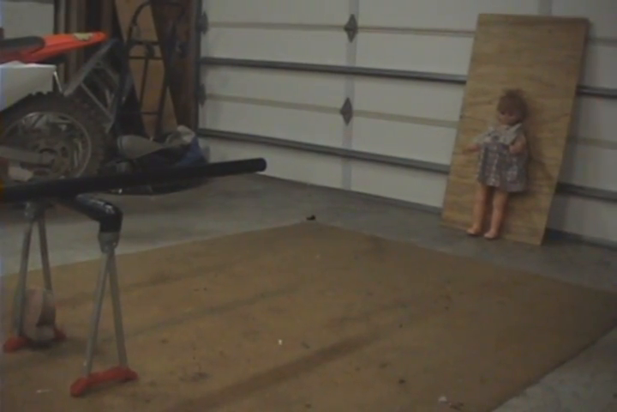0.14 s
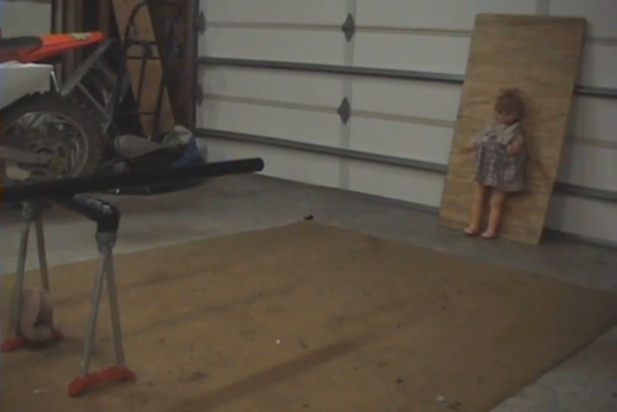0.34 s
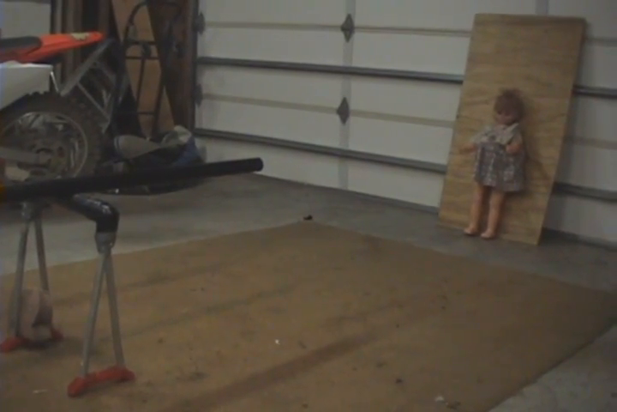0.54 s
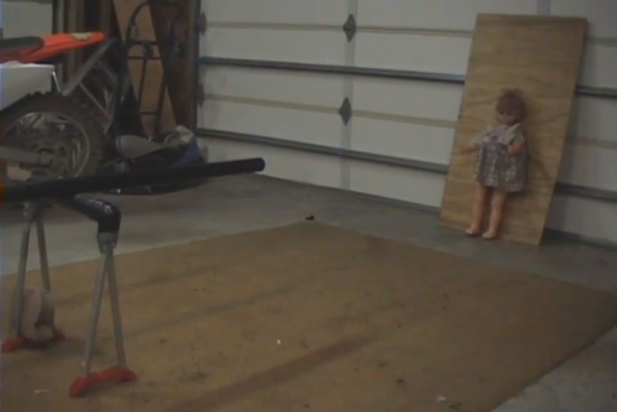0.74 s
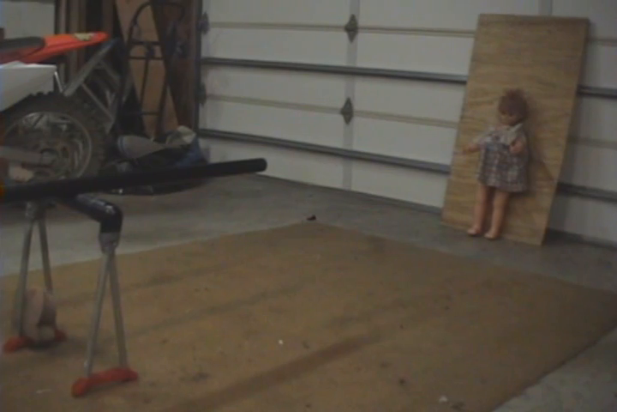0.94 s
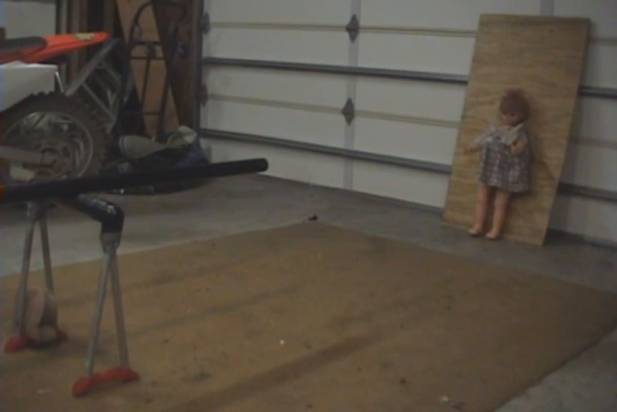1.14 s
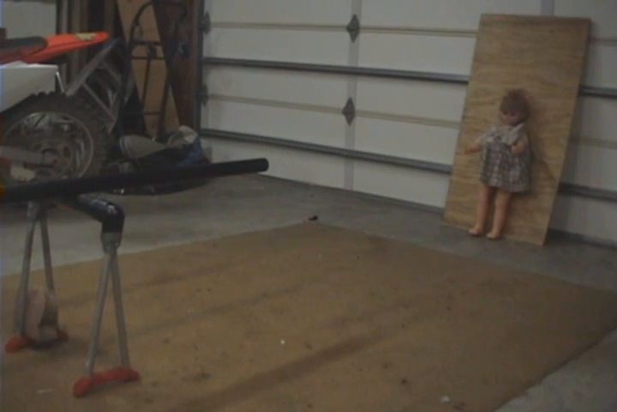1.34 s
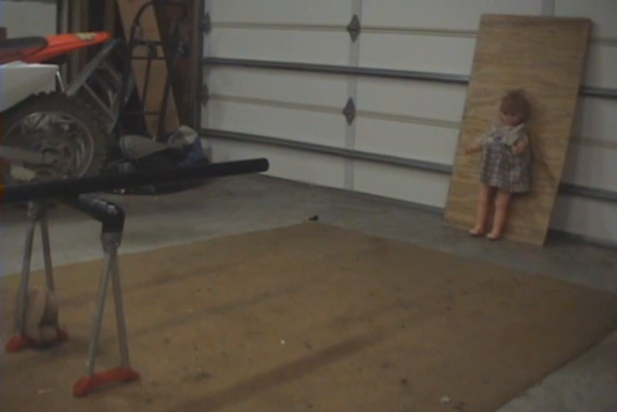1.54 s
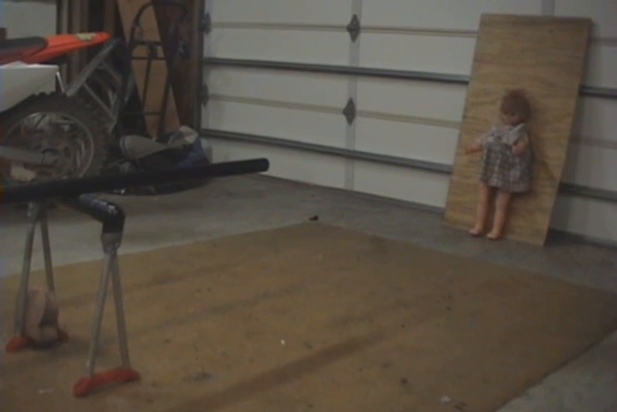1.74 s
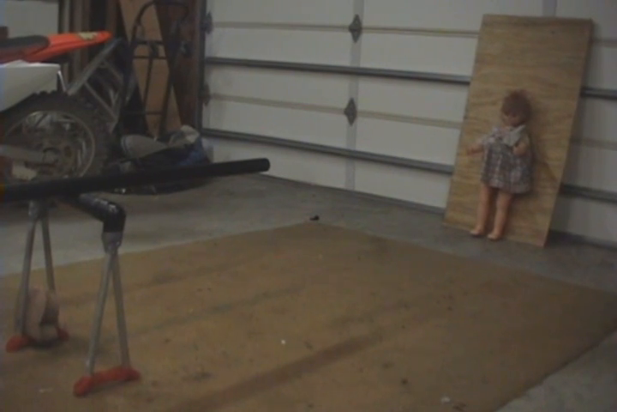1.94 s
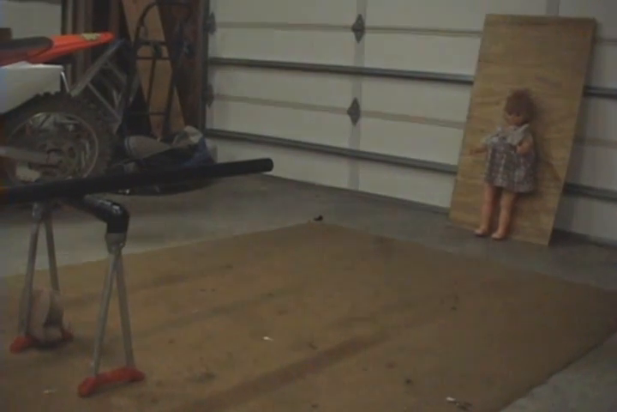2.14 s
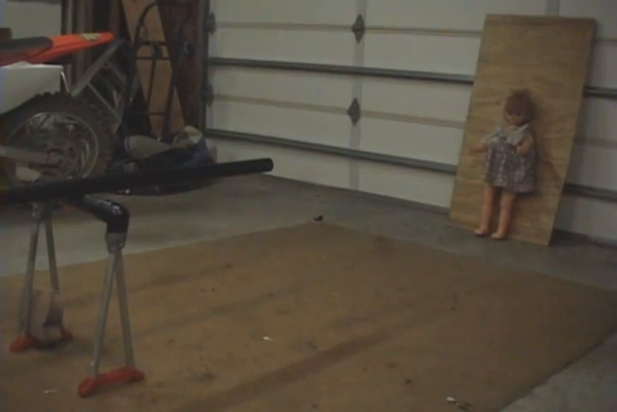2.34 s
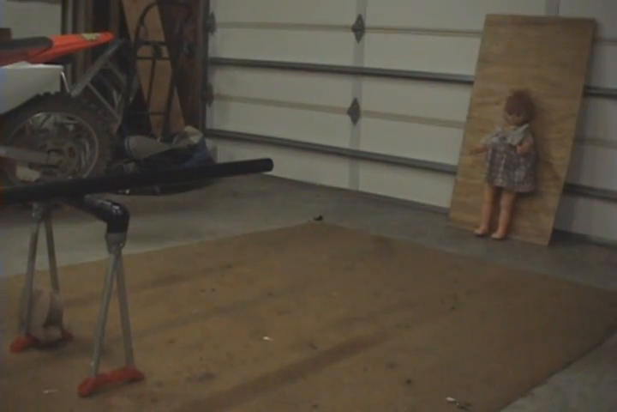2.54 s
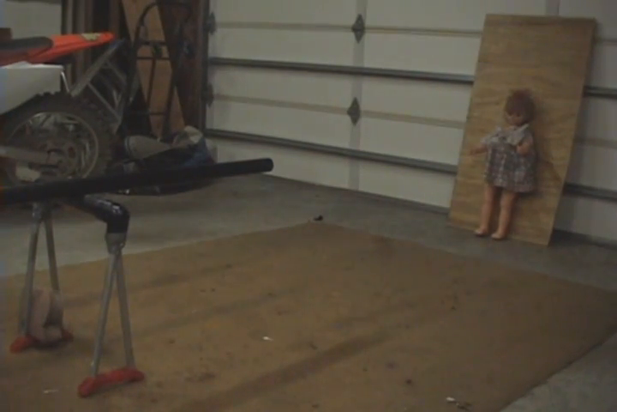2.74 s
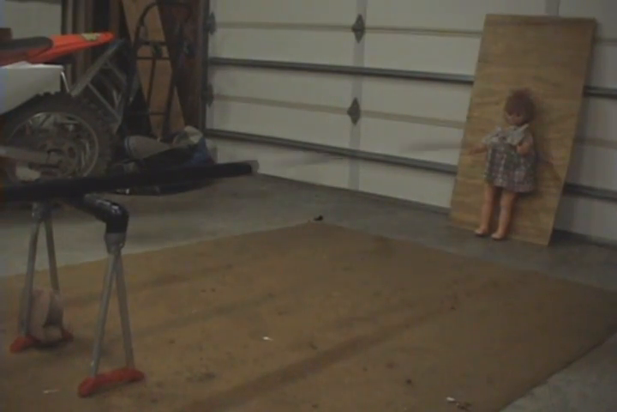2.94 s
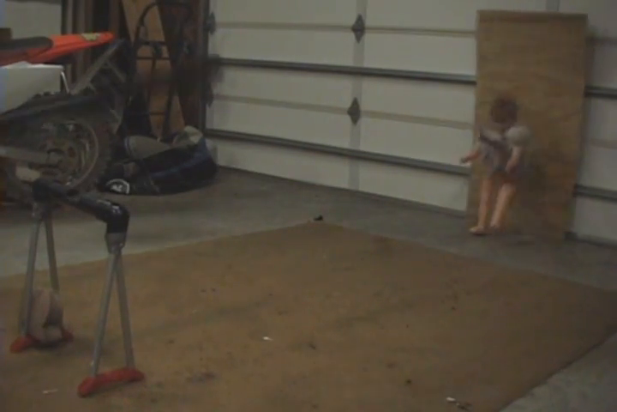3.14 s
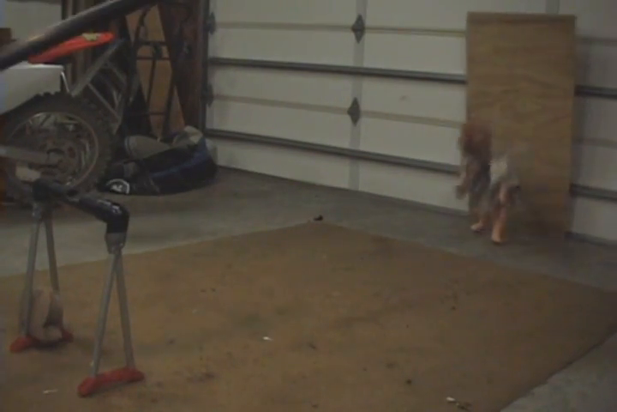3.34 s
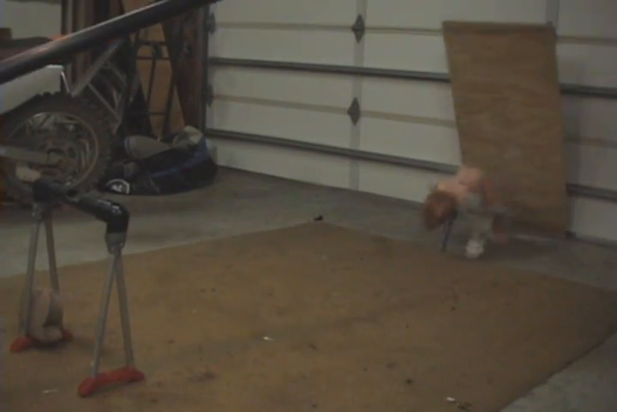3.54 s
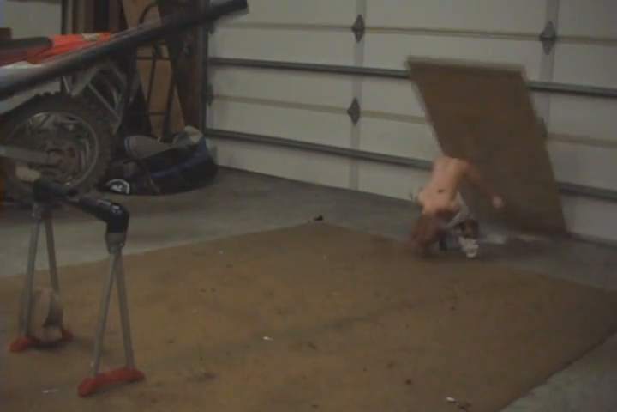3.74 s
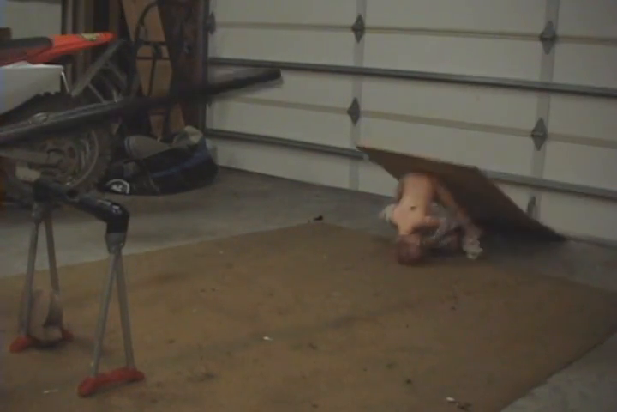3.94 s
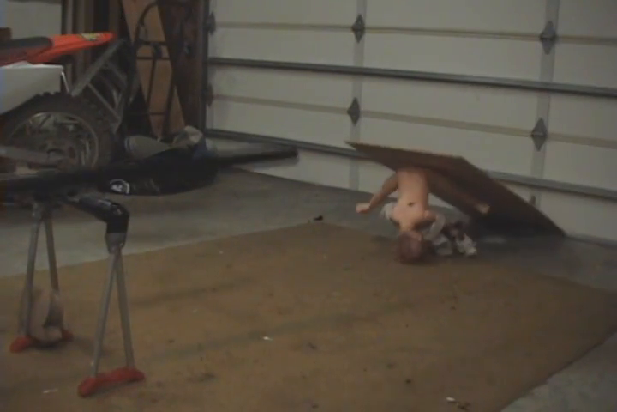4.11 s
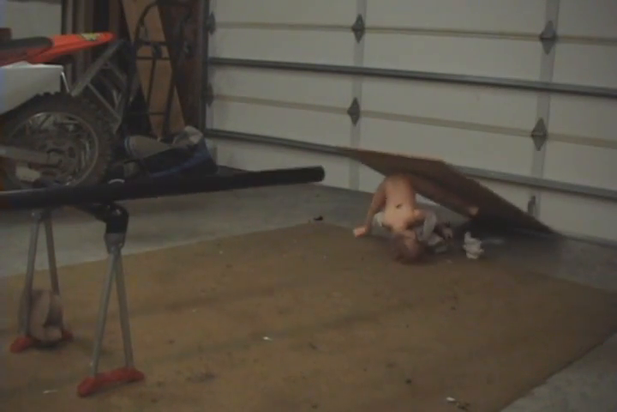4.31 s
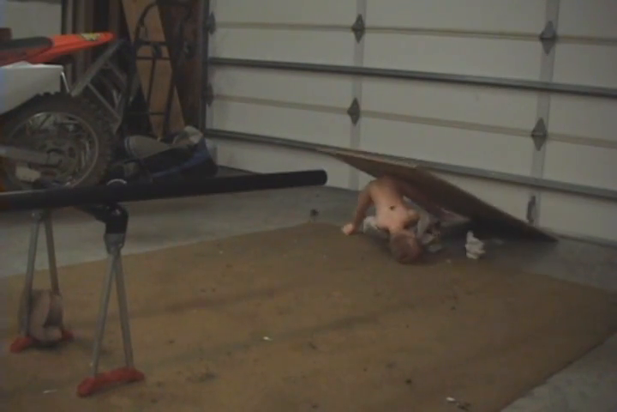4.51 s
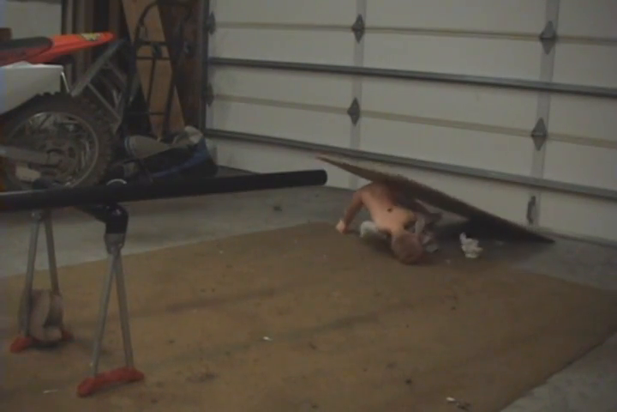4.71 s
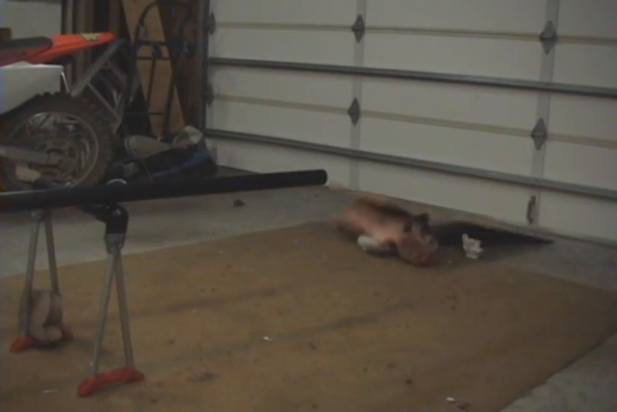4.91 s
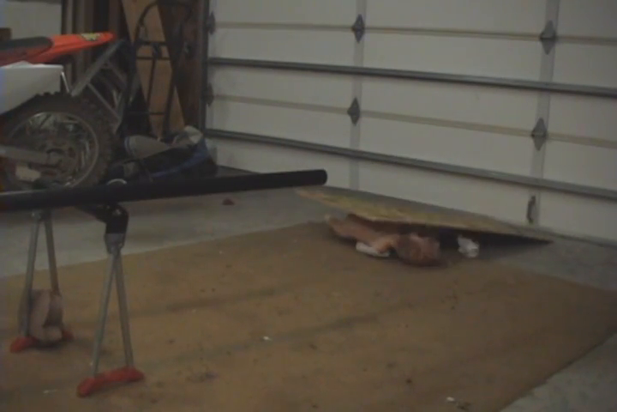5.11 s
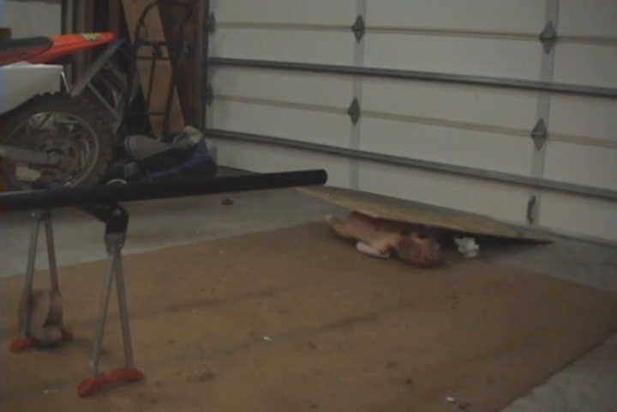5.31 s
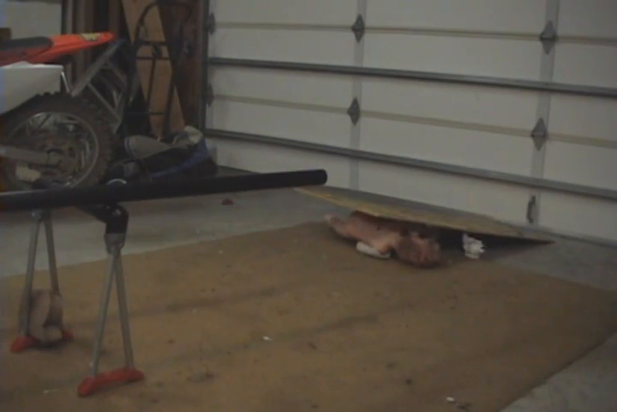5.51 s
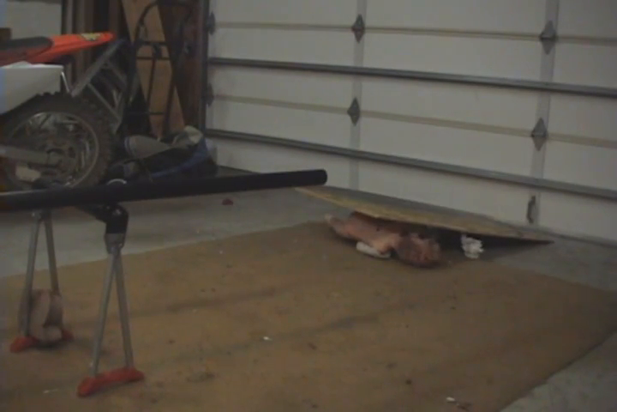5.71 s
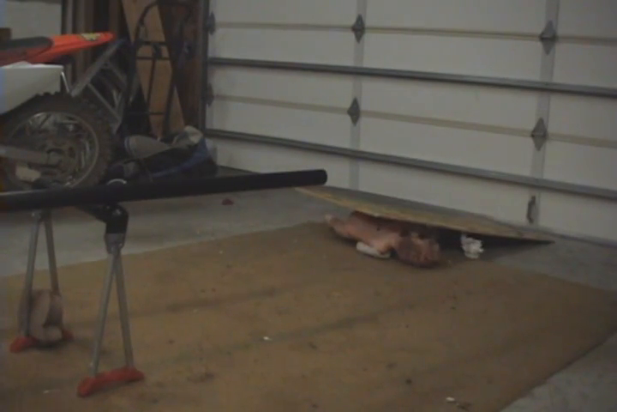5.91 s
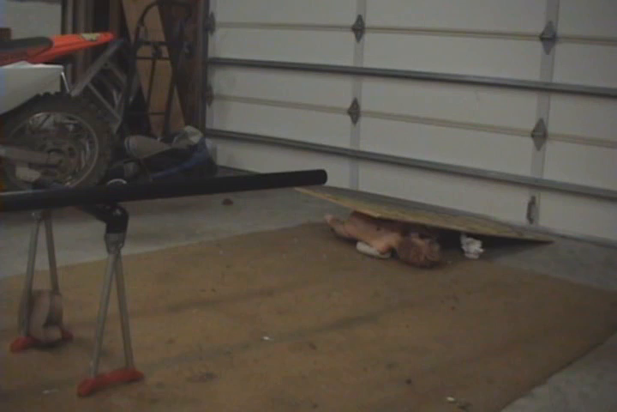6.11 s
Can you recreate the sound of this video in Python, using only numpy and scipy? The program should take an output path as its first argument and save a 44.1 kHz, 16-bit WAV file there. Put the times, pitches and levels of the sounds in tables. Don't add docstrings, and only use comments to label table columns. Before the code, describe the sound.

Plastic clicks over faint hiss and drone, then a potato gun snaps and roars in a garage, and a board and doll crash down.

```python
import sys
import numpy as np
from scipy import signal
from scipy.fft import rfft, irfft, next_fast_len
from scipy.io import wavfile
from scipy.ndimage import uniform_filter1d, map_coordinates

SR = 44100
rng = np.random.default_rng(int(sys.argv[2]) if len(sys.argv) > 2 else 0)


def gain_from_decibels(decibels):
    exponent = np.asarray(decibels, float) / 20
    return 10 ** exponent


def log_audio(samples):
    frames = np.atleast_2d(samples).T
    limited = np.clip(frames, -1, 1)
    pcm = np.round(limited * 32767).astype(np.int16)
    wavfile.write(sys.argv[1], SR, pcm)


N = 276319

# (frequency [Hz], density [dB per Hz])
HISS_COLOUR = [(12, -41), (20, -22), (43, -1), (194, -8), (595, -6), (699, -5.5), (757, -5), (889, -7.5),
               (963, -6.5), (1040, -7.5), (1290, -11), (3000, -18.5), (5000, -19), (7740, -24.5),
               (11900, -35), (15400, -60), (22000, -120)]
# (frequency [Hz], density [dB per Hz])
DRONE_COLOUR = [(20, -14), (35, 7.5), (60, 1), (150, 2), (300, 2.5), (500, -4.5), (900, -15), (2000, -46),
                (4000, -66)]
# (frequency [Hz], level [dB])
MACHINE_TONES = [(576.0, -68), (812.9, -62)]
# (time [s], length [s], frequency [Hz], width
# [Hz], level [dB])
CREAKS = [(0.035, 0.18, 1060, 35, -59), (0.43, 0.019, 1860, 300, -46), (.4235, 0.007, 1900, 400, -33.5),
          (.44, 0.032, 3000, 400, -53), (.3945, .007, 2250, 430, -46), (.398, .022, 1800, 250, -47),
          (.397, 0.0076, 3300, 600, -49), (1.7075, 0.0042, 4200, 3000, -50), (2.067, .009, 1950, 250, -44),
          (2.073, .017, 800, 250, -44), (2.105, .025, 1800, 300, -58), (1.6665, .003, 3400, 2600, -37),
          (1.6705, .012, 3200, 2500, -49), (1.672, .011, 700, 400, -42), (1.721, .007, 840, 300, -48),
          (.4205, 0.0033, 5000, 5000, -44), (2.98, .03, 3800, 1500, -55), (.97, 0.19, 230, 50, -54),
          (5.87, 0.076, 2200, 1040, -56), (.396, 0.051, 640, 330, -44), (.455, 0.043, 860, 340, -50),
          (2.292, 0.16, 1130, 25, -58), (2.283, 0.072, 600, 45, -56)]
# (time [s], peak [dB], ring [Hz], snap [dB], left-right [dB])
CLICKS = [(0.398, -40, 890, -2, 0.5), (0.423, -26.5, 960, 5.5, 1), (0.9, -56, 810, -18, -5),
          (1.097, -41, 870, -14, -2.5), (1.662, -30, 660, -13, 10), (1.6665, -23.5, 850, -21, -8),
          (1.675, -41, 720, -22, 18), (1.707, -34, 870, -33, 19), (1.918, -37.5, 795, -23, -19),
          (2.062, -15, 904, -26, 5), (2.0664, -30, 890, -36, -24), (2.0935, -39, 796, -28, 23),
          (2.506, -39.5, 900, -7, 8), (2.525, -38.5, 760, -8, 8), (2.544, -40, 859, -7, 0.0),
          (2.978, -40.5, 1140, 1.5, 5), (2.862, -55, 1100, 9, 0)]
# (time [s], peak [dB])
SPARKS = [
    (3.034, -4),
    (3.0356, -4),
    (3.0428, -19),
]
# (time [s], frequency [Hz], t60 [s], peak [dB])
BARREL_PUFF = (3.0526, 118, .1, -12)
# (time [s], strength [dB], brightness [dB])
BLAST = [
    (3.04, -49, 6.5),
    (3.074, -26, 4.5),
    (3.116, -16, 3),
    (3.14, -13, 1.5),
    (3.175, -11, -2),
    (3.23, -13.5, -3.5),
    (3.28, -12.5, -4.5),
         (3.31, -15, -1.5),
    (3.37, -12, -5),
    (3.43, -12.5, -6.5),
    (3.49, -12.5, -8.5),
    (3.575, -16, -11),
    (3.64, -16, -9.5),
    (3.67, -15, -9.5),
    (3.754, -20, -5.5),
    (3.871, -28.5, -6),
]
# (frequency [Hz], density [dB per Hz])
ROAR_COLOUR = [(18, -45), (30, -20), (80, -16.5), (149, -7), (405, -1.5), (589, -4), (685, -3), (972, -5.5),
               (1070, -5.5), (2170, -10.5), (5200, -26.5), (8790, -36.5), (11900, -48.5), (15400, -76),
               (22000, -120)]
# (frequency [Hz], width [Hz], level [dB])
DOOR_MODES = [(157, 6.5, 10), (280, 16, 7), (690, 73, -4), (1060, 52, -12), (1428, 38, 2.5), (2810, 20, 4),
              (3300, 180, -2.5), (5200, 160, -10)]
# (time [s], length [s], level [dB])
RINGING_MODES = [((153, 5.9), [(3.495, 0.3, -23), (3.75, 0.38, -31), (4.25, 0.36, -25.5),
                 (4.6, 0.5, -37.5)]), ((219, 16), [(3.06, 0.2, -23), (3.135, 0.115, -15.5)]), ((458, 51),
                 [(4.05, 0.28, -20.5), (4.3, 0.28, -31)]), ((275, 100), [(3.053, 0.077, -22),
                 (3.14, 0.043, -18), (3.185, .05, -16), (3.55, 0.32, -17.5), (4.3, 0.47, -28.5),
                 (4.94, 0.072, -20), (5.155, 0.083, -17)]), ((398, 20.4), [(3.4, 0.38, -19),
                 (5.155, 0.1, -24.5)]), ((491, 88), [(3.3, 0.27, -24.5)]), ((647, 68), [(3.55, 0.1, -19)]),
                 ((1110, 35), [(4.6, 0.06, -25), (4.73, 0.066, -36), (5.35, 0.091, -26),
                 (5.53, 0.087, -31.5)]), ((1460, 110), [(3.6, 0.069, -22)]), ((3060, 200),
                 [(3.072, 0.025, -18.5)]), ((2830, 70), [(3.1, 0.091, -22)]), ((3800, 250),
                 [(3.097, 0.011, -20), (3.2, .012, -19)]), ((2500, 250), [(3.47, .03, -31),
                 (4.73, 0.038, -43)]), ((778, 60), [(4.595, .04, -26), (4.74, .04, -33.5)]), ((142, 50),
                 [(5.5, .4, -45.5)]), ((3200, 260), [(3.165, .04, -22), (3.24, .04, -22.5),
                 (3.295, 0.041, -24.5), (3.345, 0.012, -22), (3.365, 0.023, -26), (3.4, .03, -32)]),
                 ((3250, 120), [(3.11, 0.31, -29)]), ((4200, 150), [(3.862, 0.029, -31)]), ((4120, 82),
                 [(3.435, 0.074, -31.5)]), ((4600, 320), [(4.415, .05, -34), (4.47, 0.058, -39)]),
                 ((5150, 200), [(3.12, 0.035, -24), (3.24, .05, -28)])]
# (time [s], force [dB], brightness [dB])
TOPPLE = [
    (3.86, -25.5, -11),
    (3.97, -26.5, -13),
    (3.974, -17, -9),
    (3.992, -16.5, -15),
    (4.028, -16.5, -13),
    (4.096, -14, -1.5),
    (4.224, -16, -7),
    (4.258, -15, -6.5),
    (4.315, -16.5, -13),
]
# (time [s], force [dB], brightness [dB])
SKID = [
    (4.329, -19.5, -1),
    (4.408, -15, -6),
    (4.422, -20.5, -2.5),
    (4.53, -23, -7.5),
    (4.585, -30, -6.5),
]
# (time [s], force [dB], brightness [dB])
SETTLE = [
    (4.6, -22.5, -24),
    (4.7, -33, -11),
    (4.93, -32.5, -13),
    (5.3, -28, -15),
    (5.6, -38.5, -15),
    (5.7, -44.5, -14),
    (5.82, -52, -2),
]
# (frequency [Hz], density [dB per Hz])
SCRAPE_COLOUR = [(18, -60), (30, -29), (113, -14), (153, -2.5), (405, -1.5), (448, 0.5), (547, -6),
                 (1050, -9), (1280, -11), (4590, -20), (9010, -35.5), (11000, -55), (11900, -58),
                 (15400, -86), (22000, -120)]
# (frequency [Hz], width [Hz], level [dB])
PLYWOOD_MODES = [(157, 65, -8.5), (238.5, 135, -5), (337, 77, -2), (446.5, 46, -0.5), (630, 175, -5),
                 (795, 96, -3.5), (1052, 112, -6.5), (1500, 500, -12.5)]
# (time [s], peak [dB], centre [Hz], room [dB])
CRACKS = [(3.489, -20, 3020, -5), (3.65, -25.5, 6500, 8.5), (3.755, -21, 6000, -4),
          (3.863, -22, 7400, 13.5), (3.96, -26, 6520, 10.5), (3.972, -17, 4500, -7), (3.981, -22, 5000, -5),
          (4.033, -4, 2290, -9), (4.0335, -10, 5500, -6), (4.054, -5.5, 2400, -11), (4.0532, -11, 5500, -1),
          (4.071, -9, 2600, -11), (4.074, -20, 7500, 0), (4.099, -9, 5200, 1), (4.174, -20, 2800, -8),
          (4.192, -17, 1980, 0), (4.253, -10, 2290, -4), (4.252, -21, 5500, -11), (4.224, -21, 3000, -8),
          (4.324, -17.5, 8800, 5.5), (4.344, -22, 6500, 0.0), (4.359, -9.5, 2670, 4),
          (4.376, -15, 3480, -9), (4.414, -18, 5000, 3.5), (4.426, -14, 8550, 2), (4.452, -23, 3000, -10),
          (4.496, -20.5, 4740, 0.5), (4.545, -27, 3000, 0), (4.5922, -22.5, 2180, 8),
          (4.716, -40, 4500, -1), (4.73, -30.5, 2580, 2), (4.731, -37, 6500, -5),
          (4.939, -12, 1870, 3), (4.941, -21, 4500, 0), (5.116, -23, 4500, -3), (5.117, -24, 2500, 0),
           (5.1266, -17, 3200, 3), (5.138, -22, 2800, 2), (5.126, -20.5, 6500, 4), (5.127, -15, 2100, 1),
           (5.154, -12, 1710, -1), (5.155, -18, 3300, 1), (5.185, -22, 2600, 0), (5.299, -33, 4170, -5),
           (5.3005, -23, 1250, 4), (5.343, -15, 2480, 2.5), (5.346, -12.5, 1500, 2),
           (5.354, -34, 7000, -16), (5.36, -20, 1710, 5.5), (5.422, -32, 5440, -1), (5.497, -35, 1100, 3),
           (5.5155, -17.5, 2300, -2), (5.522, -30, 2600, 4), (5.534, -31, 2700, 2), (5.572, -32, 1300, 6),
           (5.61, -32, 1310, 1)]
# (time [s], peak [dB], centre [Hz], room [dB])
SNAPS = [
    (4.0815, -4.5, 3800, -10),
    (4.1275, -4, 3000, -11),
]
# (time [s], peak [dB], centre [Hz], room [dB])
PINGS = [
    (3.8615, -15.5, 3800, -2),
    (3.93, -8, 2390, -1),
    (3.933, -16, 1900, 0),
    (3.87, -24, 2900, 2),
    (4.323, -9.5, 4730, 2.5),
]
# (time [s], peak [dB], t60 [s], dull above [Hz])
THUDS = [(3.765, -11, 0.024, 597), (3.779, -10.5, 0.047, 597), (3.9713, -3.5, 0.079, 1200),
         (4.045, -5.5, 0.068, 910), (4.17, -5.5, 0.23, 714), (4.325, -10, 0.07, 800),
         (4.591, -11.5, 0.19, 1580), (4.674, -21, 0.056, 1200), (4.742, -21.5, 0.1, 1000),
         (4.867, -28, 0.067, 500), (4.936, -13.5, .05, 500), (4.939, -11.5, 0.15, 700),
         (4.956, -12.5, 0.097, 550), (5.126, -18, 0.2, 900), (5.154, -7, 0.14, 826),
         (5.171, -8.5, 0.092, 650), (5.197, -6.5, 0.04, 604), (5.21, -13, .12, 500),
         (5.3, -14.5, 0.4, 1000), (5.342, -6, 0.093, 2090), (5.356, -5, 0.19, 1300),
         (5.410, -8.5, 0.049, 800), (5.515, -14, 0.3, 1500), (5.555, -16.5, 0.31, 800)]
# (time [s], length [s], frequency
# [Hz], width [Hz], level [dB])
DUST = [(5.78, .48, 4300, 4600, -64.5), (4.4, 0.17, 7400, 2200, -43.5), (4.56, 0.56, 5200, 3600, -55),
        (5.43, 0.29, 4500, 4500, -66), (3.865, 0.026, 6100, 2200, -32.5), (4.96, 0.16, 4300, 4000, -43),
        (5.1, 0.037, 4900, 4300, -49), (5.35, 0.11, 2400, 1300, -37.5), (5.52, 0.064, 2100, 1000, -44),
        (4.035, 0.086, 4400, 2600, -29.5), (5.16, .08, 2400, 1500, -37.5)]
# (frequency [Hz], t60 [s])
GARAGE_T60 = [(100, 1), (500, 0.42), (2000, 0.41), (6000, 0.34), (11000, 0.23)]
# (frequency [Hz], left-right [dB])
LEAN = [(60, 2), (170, 0), (490, 1.0), (1400, 2), (4000, 0), (11400, -1.5)]
# (frequency [Hz], left-right likeness [-])
BLAST_ALIKE = [(30, .75), (80, 0.92), (160, 1), (350, 0.97), (830, 0.89), (2000, 0.71), (4500, 0.82),
               (11000, 0.79)]
# (frequency [Hz], left-right likeness [-])
LOUD_ALIKE = [(30, .75), (70, 1), (160, 1), (350, 0.96), (830, 0.86), (2000, 0.74), (4000, 0.93),
              (11000, 0.97)]
# (frequency [Hz], left-right likeness [-])
QUIET_ALIKE = [(60, 0.82), (140, 0.78), (350, 0.12), (830, 0.082), (2000, 0.14), (11000, 0.068)]
CEILING = [
    [1.13],
    [0.97],
]
# (from time [s], top [Hz])
TREBLE_TOP = [(0, 11340), (3.02, 11300), (3.038, 12100), (3.19, 11400), (3.215, 10800), (3.27, 11300),
              (3.38, 10500), (4.05, 10200), (4.17, 9500), (4.21, 10300), (4.285, 8400), (4.3, 11230),
              (4.58, 10600), (5.12, 11000), (5.17, 10650), (5.7, 11480)]
# (from time [s], to time [s], low [Hz], high [Hz])
TREBLE_HOLES = [(4.205, 4.3, 8800, 9300), (3.83, 3.85, 8400, 9000), (4.76, 4.82, 9100, 9400),
                (5.41, 5.5, 9300, 9800)]
# (from time [s], to time [s])
WIDE_TREBLE = [(.41, .44), (1.655, 1.68), (2.055, 2.075), (2.14, 2.2), (3.04, 3.27), (4.07, 4.09),
               (4.3, 4.35), (5.66, 5.73)]

HISS_DB, GAIN_BACK_S, GAIN_BACK_DB_PER_S = -51.5, 5.75, 4
MACHINE_DB, MACHINE_STOP_S, COAST_S, IDLE_DB = -50.5, 2.19, 0.13, -61
TONES_DB, TONES_DROP_DB = -5.5, 29
OVERTONES_DB, OVERTONES_GROW = -3.5, 0.21
RASP_DB, GRIT_DB, GRIT_GROWS = 0.4, -16, 0.79
CRACK_WIDTH_HZ, PING_WIDTH_HZ, SNAP_LEFT_DB, THUD_ROOM_DB = 1580, 1400, 6, -1.5
FLAT_DB, FLAT_DB_PER_OCTAVE, FLAT_MOST_DB = -35, 22.5, 12
GAS_ROAR_DB, GAS_HISS_DB, GAS_HISS_GROWS, BLAST_LEFT_DB = 0, -2.5, 2.22, 0.8


def unit(x):
    return x / np.sqrt(np.mean(x ** 2) + 1e-20)


def peak1(x):
    return x / np.abs(x).max()


def along(points, hz):
    f, v = np.transpose(points)
    return np.interp(np.log(hz + 1), np.log(f + 1), v)


def curves(rows):
    s, *cols = np.transpose(rows)
    return [np.interp(np.arange(N) / SR, s, c, left=-120, right=-120) for c in cols]


def wobble(rate):
    knots = rng.standard_normal(int(N * rate / SR) + 4)
    return map_coordinates(knots, [np.arange(N) * rate / SR])


def filtered(x, response):
    m = next_fast_len(x.shape[-1] + 8192)
    return irfft(rfft(x, m) * response(np.fft.rfftfreq(m, 1 / SR)), m)[..., :x.shape[-1]]


def resonances(modes):
    def response(f):
        total = 0
        for k, (c, w, db) in enumerate(modes):
            total = total + (-1) ** k * gain_from_decibels(db) * 1j * f * w / (c * c - f * f + 1j * f * w)
        return total
    return response


def ports(pair, alike):
    turn = lambda hz: np.arccos(np.clip(along(alike, hz), -1, 1)) / 2
    mid, side = filtered(pair, lambda hz: np.array([np.cos(turn(hz)), np.sin(turn(hz))]))
    return np.array([mid + side, mid - side])


def rush(gain, alike, patchy_db):
    z = signal.stft(rng.standard_normal((2, N)), nperseg=512)[2]
    field = uniform_filter1d(rng.standard_normal(z.shape[1:]), size=4, axis=0)
    field = uniform_filter1d(field, size=8, axis=1)
    pair = signal.istft(z * gain_from_decibels(patchy_db * unit(field)), nperseg=512)[1][:, :N]
    return ports(filtered(pair, gain), alike)


def by_band(x, levels):
    low = lambda f: 1 / (1 + (f / 1000) ** 6)
    high = lambda f: 1 / (1 + (4000 / (f + 1)) ** 6)
    middle = lambda f: 1 - low(f) - high(f)
    parts = [filtered(x, band) for band in (low, middle, high)]
    return sum(gain_from_decibels(db) * unit(part) for part, db in zip(parts, levels))


def add(out, s, x):
    piece = out[:, round(s * SR):][:, :x.shape[-1]]
    piece += x[..., :piece.shape[1]]


def in_garage(x, wet_db, pan_db=0, feed=None, size=SR):
    hz, t, z = signal.stft(rng.standard_normal((2, size)), SR, nperseg=256)
    decay = gain_from_decibels(-60 * t / along(GARAGE_T60, hz)[:, None])
    tail = signal.istft(z * decay, SR, nperseg=256)[1][:, :size]
    thicken = 1 - np.exp(-np.arange(size) / SR / 0.0038)
    tail = ports(tail, LOUD_ALIKE) * thicken
    source = x if feed is None else feed
    out = gain_from_decibels(wet_db) * signal.fftconvolve(source[None], tail / np.linalg.norm(tail[0]), axes=1)
    out[:, :len(x)] += x * gain_from_decibels([[pan_db / 2], [-pan_db / 2]])
    return out


def rubs(rows):
    out = np.zeros((2, N))
    for s, length, hz, width, db in rows:
        noise = rng.standard_normal((2, SR // 2))[:, :round(length * SR)]
        rub = filtered(noise, lambda f: resonances([(hz, 1.55 * width, 0)])(f) ** 2)
        stereo = unit(ports(rub, [(150, 1.0), (1000, 0.83)]))
        size = rub.shape[1]
        add(out, s, gain_from_decibels(db) * stereo * np.hanning(size) ** 0.21 * gain_from_decibels(np.linspace(2.5, -2.5, size)))
    return out


def background():
    t = np.arange(N) / SR
    stopped = np.clip((t - MACHINE_STOP_S) / COAST_S, 0, 1)
    drone_db = MACHINE_DB + (IDLE_DB - MACHINE_DB) * stopped
    tones_db = TONES_DB - TONES_DROP_DB * stopped
    hiss_db = GAIN_BACK_DB_PER_S * np.maximum(t - GAIN_BACK_S, 0)

    hiss = unit(rush(lambda f: gain_from_decibels(along(HISS_COLOUR, f)), QUIET_ALIKE, patchy_db=1.26))
    hiss = gain_from_decibels(HISS_DB + hiss_db) * hiss
    drone = unit(rush(lambda f: gain_from_decibels(along(DRONE_COLOUR, f)), QUIET_ALIKE, patchy_db=-2.0))
    drone = gain_from_decibels(drone_db + hiss_db + 1.1 * wobble(4.8)) * drone
    tones = np.zeros(N)
    for hz, db in MACHINE_TONES:
        level = gain_from_decibels(db + 6 + tones_db + 1.2 * wobble(3.7))
        tones += level * np.sin(2 * np.pi * hz * t + .3 * wobble(2.7))
    return hiss + drone + tones + rubs(CREAKS)


def clicks():
    out, t = np.zeros((2, N)), np.arange(SR // 10) / SR
    impulse = 1. * (t == 0)
    bright = lambda f: resonances([(5000, 9000, 0)])(f) ** 2
    for s, db, hz, snap_db, pan_db in CLICKS:
        over_db = OVERTONES_DB + OVERTONES_GROW * (db + 32.5)
        pipe = resonances([(0.56 * hz, 200, -12), (hz, 170, 0), (2.11 * hz, 220, over_db - 0.4)])
        upper = resonances([(3.63 * hz, 300, 2 * over_db - 7.0), (5.2 * hz, 400, 2 * over_db - 12.0)])
        soft = lambda f: 1 / (1 + 1j * f / (3000 * gain_from_decibels(0.34 * over_db))) ** 2
        ring = peak1(filtered(impulse, lambda f: (pipe(f) + upper(f)) * soft(f)))
        burst = rng.standard_normal(len(t)) * gain_from_decibels(-60 * t / 0.024)
        snap = gain_from_decibels(snap_db) * peak1(filtered(burst, bright))
        smooth = unit(filtered(impulse, bright)) * np.std(snap)
        feed = 0.27 * ring + smooth
        click = in_garage(ring + snap, wet_db=-7.0, pan_db=pan_db, feed=feed, size=SR // 2)
        add(out, s + .0006, -gain_from_decibels(db) * click)
    return out


def igniter():
    out, t = np.zeros((2, N)), np.arange(SR // 10) / SR
    for s, db in SPARKS:
        spark = 0.4 * rng.standard_normal(len(t)) * gain_from_decibels(-60 * t / 0.0061) - (t == 0)
        add(out, s, gain_from_decibels(db) * in_garage(spark, wet_db=-2.0, size=SR // 2))
    return out


def slide():
    colour = lambda f: gain_from_decibels(along(SCRAPE_COLOUR, f)) * (1 + 0.45 * np.abs(resonances(PLYWOOD_MODES)(f)))
    chatter = wobble(60)
    catches = np.abs(wobble(170)) - .8
    shudder, bright = curves(TOPPLE + SKID + SETTLE)
    rasp = shudder + RASP_DB + bright
    grit = shudder + GRIT_DB + GRIT_GROWS * bright
    levels = [shudder + 0.76 * chatter,
              rasp + 1.26 * chatter + 2.1 * catches,
              grit + 0.6 * chatter + 2.5 * catches]
    return by_band(rush(colour, LOUD_ALIKE, patchy_db=0.0), levels)


def cracks(rows, width=CRACK_WIDTH_HZ, pan_db=0):
    out, t = np.zeros((2, N)), np.arange(SR // 20) / SR
    for s, db, hz, wet_db in rows:
        flat_db = min(FLAT_DB + FLAT_DB_PER_OCTAVE * np.log2(hz / 2000), FLAT_MOST_DB)
        splash = lambda f: resonances([(4000, 6000, flat_db)])(f) / (1 + 1j * f / 9000)
        edge = lambda f: resonances([(hz, width, 0)])(f) ** 2 + splash(f)
        burst = rng.standard_normal(len(t)) * gain_from_decibels(-60 * t / 0.0091)
        crack = peak1(filtered(burst, edge))
        smooth = filtered(1. * (t == 0), edge)
        feed = smooth * np.linalg.norm(crack) / np.linalg.norm(smooth)
        add(out, s, gain_from_decibels(db) * in_garage(crack, wet_db, pan_db, size=SR // 3, feed=feed))
    return out


def thuds():
    out, t = np.zeros((2, N)), np.arange(SR // 2) / SR
    for s, db, t60, dull_hz in THUDS:
        decay = gain_from_decibels(-60 * t / t60) + 2.0 * gain_from_decibels(-60 * t / 0.0035)
        shake = rng.standard_normal(len(t)) * decay - 14 * (t == 0)
        board = lambda f: resonances(PLYWOOD_MODES)(f) / (1 + 1j * f / dull_hz) / (1 + 1j * f / 5000)
        thud = peak1(filtered(shake, board))
        add(out, s, gain_from_decibels(db) * in_garage(thud, THUD_ROOM_DB, size=3 * SR // 4))
    return out


def blows():
    edges = cracks(CRACKS) + cracks(SNAPS, pan_db=SNAP_LEFT_DB)
    return edges + cracks(PINGS, width=PING_WIDTH_HZ) + thuds()


def door_rings():
    rows = []
    for (hz, width), shakes in RINGING_MODES:
        rows += [(s, length, hz, width, db) for s, length, db in shakes]
    return rubs(rows)


def puff():
    out, t = np.zeros((2, N)), np.arange(SR // 4) / SR
    s, hz, t60, db = BARREL_PUFF
    swell = 1 - np.exp(-t / 0.019)
    add(out, s, gain_from_decibels(db - 60 * t / t60) * np.sin(2 * np.pi * hz * t) * swell * 2)
    return out


def blast():
    def colour(f):
        door = sum(gain_from_decibels(db) * w * w / (w * w + 4 * (f - c) ** 2) for c, w, db in DOOR_MODES)
        return gain_from_decibels(along(ROAR_COLOUR, f)) * (1 + door / 2)

    rattle = wobble(45) + 1.1 * (np.abs(wobble(160)) - .8)
    boom, bright = curves(BLAST)
    roar = boom + GAS_ROAR_DB + bright
    hiss = boom + GAS_HISS_DB + GAS_HISS_GROWS * bright
    levels = [boom + .5 * rattle, roar + .9 * rattle, hiss + 1.1 * rattle]
    gas = by_band(rush(colour, BLAST_ALIKE, patchy_db=1.5), levels)
    return gain_from_decibels([[BLAST_LEFT_DB / 2], [-BLAST_LEFT_DB / 2]]) * gas


def scene():
    lean = lambda f: gain_from_decibels(along(LEAN, f) * np.array([[.5], [-.5]]))
    quiet = background() + clicks() + igniter() + puff()
    loud = slide() + rubs(DUST) + blows() + door_rings() + blast()
    return quiet + filtered(loud, lean)


def band_limit(x):
    return signal.sosfilt(signal.butter(12, 12020, fs=SR, output="sos"), x)


def record(dry):
    hard = 4
    x = dry / (1 + np.abs(dry / np.array(CEILING)) ** hard) ** (1 / hard)
    mid_side = np.array([x[0] + x[1], x[0] - x[1]]) / 2
    hz, t, z = signal.stft(mid_side, SR, nperseg=512)
    start, top_hz = np.transpose(TREBLE_TOP)
    top_now = top_hz[np.searchsorted(start, t, side="right") - 1]
    z = z / (1 + (hz[:, None] / top_now) ** 80)
    for a, b, low, high in TREBLE_HOLES:
        z *= ~np.outer((hz > low) & (hz < high), (t > a) & (t < b))
    wide = sum((t > a) & (t < b) for a, b in WIDE_TREBLE) > 0
    z[1] *= wide | (hz[:, None] < 4000)
    mid, side = signal.istft(z, SR, nperseg=512)[1][:, :N]
    return band_limit(np.array([mid + side, mid - side]))


dry = scene()
out = record(dry)
log_audio(out)
```